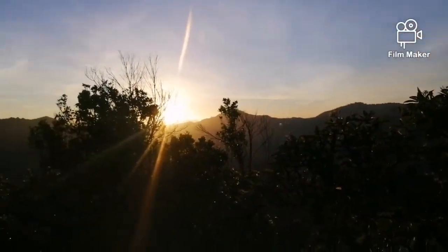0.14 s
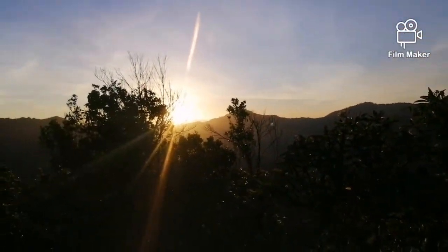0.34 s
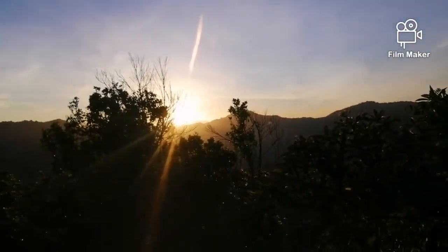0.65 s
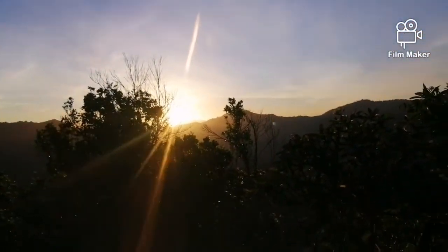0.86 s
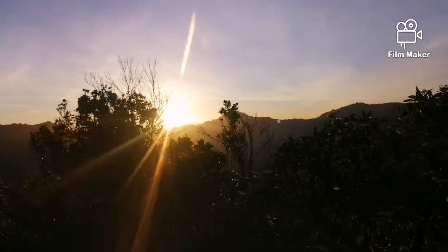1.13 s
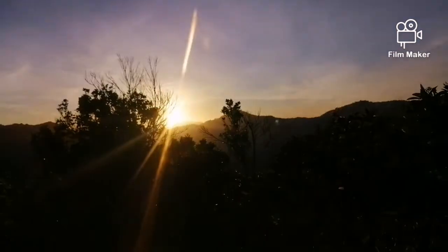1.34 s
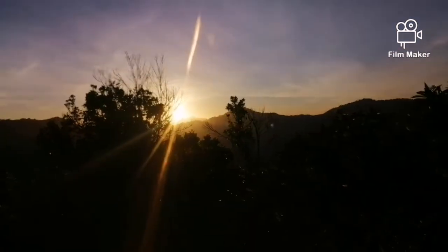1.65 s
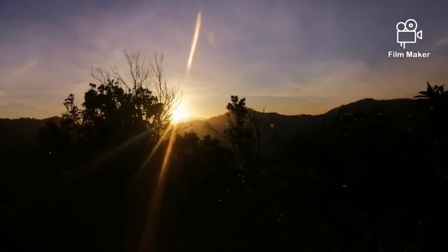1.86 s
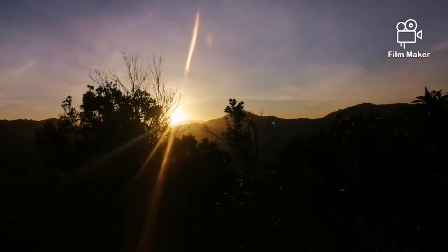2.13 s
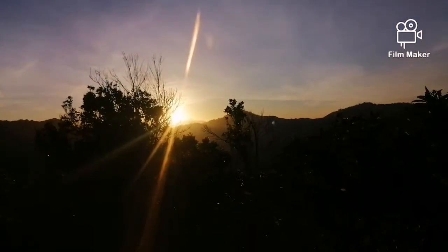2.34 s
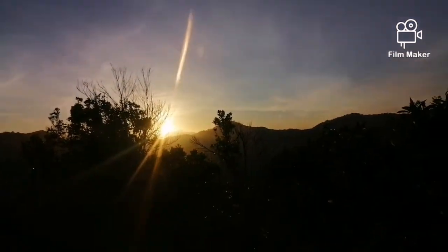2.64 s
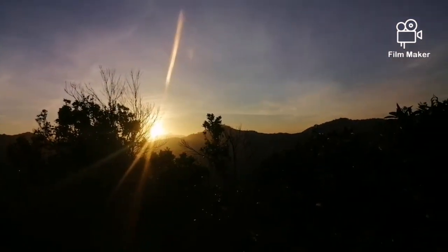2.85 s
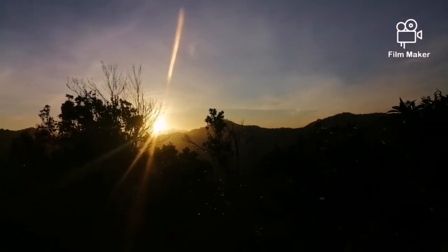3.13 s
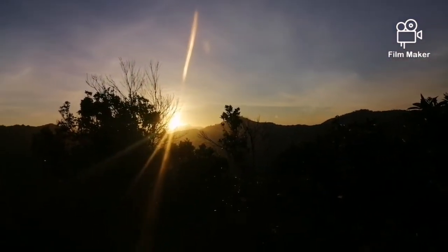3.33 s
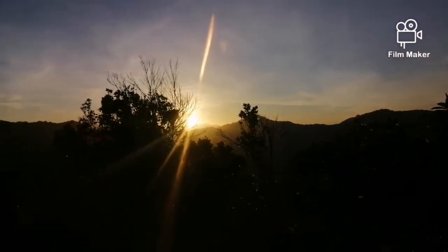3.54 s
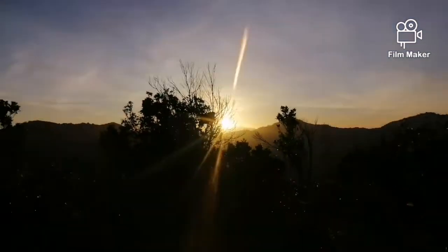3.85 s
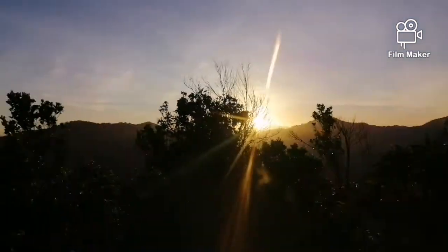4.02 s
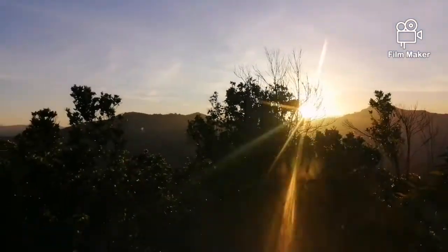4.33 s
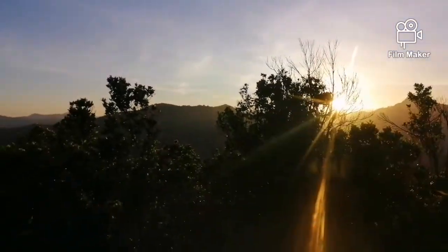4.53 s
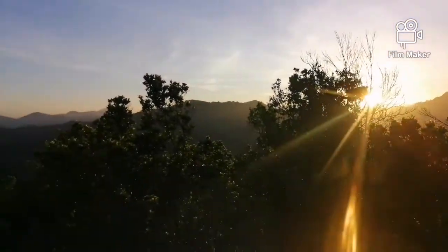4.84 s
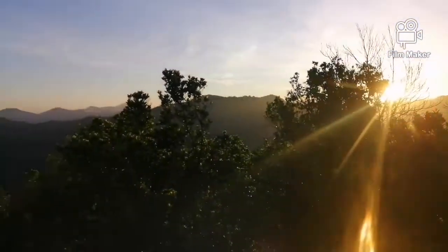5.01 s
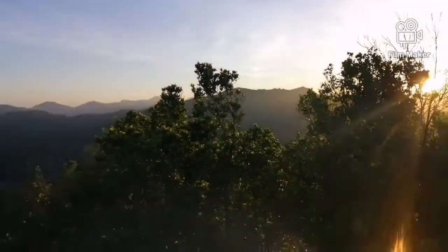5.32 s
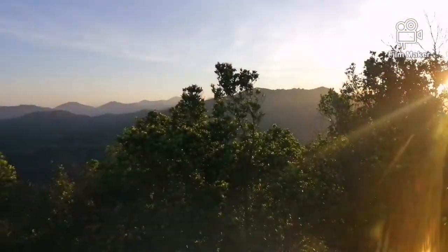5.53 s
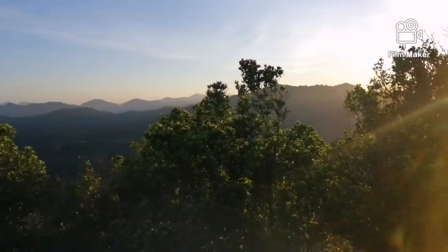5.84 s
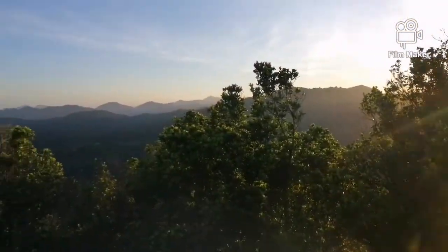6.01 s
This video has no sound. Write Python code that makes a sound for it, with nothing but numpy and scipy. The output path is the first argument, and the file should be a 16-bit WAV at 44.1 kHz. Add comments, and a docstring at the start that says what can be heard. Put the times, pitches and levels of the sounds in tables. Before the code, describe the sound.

Outdoors on a wooded hillside in low sun, one close bird on the right gives short, nasal-edged rising chips, roughly two or three a second. Others of its kind answer softer among the trees, a small warbler twitters, and distant birds whistle. Quiet air and a wavering low hum lie beneath. The hand-held stereo microphone pops early and knocks near the end, as its turn makes the chips more central and duller.

```python
"""A near bird, to the right, repeats a short two-part chip: a nasal lead-in, then a rising two-pulse note.
Its flock answers from deeper in the trees with the same partials, softer and more echoed. A small warbler
twitters and far birds whistle in gliding sines; decaying noise tails make the forest echo of every call.
Under this dawn chorus lie shaped-noise air and a low wavering hum. The hand-held microphone adds pops
(leaking jumps), knocks (decaying noise) and rumble (bass noise)."""
import sys
import numpy as np
from scipy import signal
from scipy.fft import rfft, irfft, next_fast_len
from scipy.io import wavfile
from scipy.ndimage import map_coordinates

SR = 44100
rng = np.random.default_rng(int(sys.argv[2]) if len(sys.argv) > 2 else 0)


def store_wav(level_fs):
    """Save 16-bit WAV to argv[1]."""
    pcm = np.round(np.clip(np.atleast_2d(level_fs), -1, 1) * 32767)
    wavfile.write(sys.argv[1], SR, pcm.T.astype(np.int16))


N = 272097

CHIP_LEAD_S = .02  # room for the lead-in ahead of a chip's main note

# The warbler's kinds of note. Each entry: length in seconds, end pitch over start pitch, pitch roughness
# as a fraction.
WARBLER_NOTES = {"up": (.015, 1.19, .016), "flick": (.012, .8, .022), "down": (.028, .79, .028),
                 "buzz": (.025, .88, .055), "slide": (.035, 1.1, .025), "trill": (.08, .91, .075)}


def amp(db):
    """Decibels to gain."""
    return 10 ** (np.asarray(db) / 20)


def unit(x):
    """Scale to rms 1."""
    return x / np.sqrt(np.mean(x ** 2) + 1e-20)


def along(points, hz):
    """(Hz, value) points read on a log frequency axis."""
    f, v = np.transpose(points)
    return np.interp(np.log(hz + 1), np.log(f + 1), v)


def curve(rows):
    """(seconds, value) rows drawn as a line, one value per sample."""
    return np.interp(np.arange(N) / SR, *np.transpose(rows))


def wobble(rate, size=N):
    """A smooth random curve with rate knots a second."""
    knots = rng.standard_normal(int(size * rate / SR) + 4)
    return map_coordinates(knots, [np.arange(size) * rate / SR])


def filtered(x, response):
    """x with its spectrum multiplied by a response of frequency."""
    m = next_fast_len(x.shape[-1] + SR // 4)
    spectrum = rfft(x, m) * response(np.fft.rfftfreq(m, 1 / SR))
    return irfft(spectrum, m)[..., :x.shape[-1]]


def sides(balance_db):
    """Left and right gains of mean power 1; a positive balance leans left."""
    g = amp(np.array([[.5], [-.5]]) * balance_db)
    return g / np.sqrt(np.mean(g ** 2, axis=0))


def add(out, s, x):
    """Mix x into out from time s in seconds."""
    i = max(round(s * SR), 0)
    out[:, i:i + x.shape[1]] += x[:, :max(N - i, 0)]


def gate(t, start, end, edge):
    """1 from start to end, with soft edges."""
    return (np.tanh((t - start) / edge) - np.tanh((t - end) / edge)) / 2


def echoes(x, leaves_db, forest_db, leaves_t60, balance_db):
    """Near foliage scatters a sound quickly; the trunks behind give a long tail, duller on the left."""
    # The forest's decay. Each row: frequency in Hz, time to fall 60 dB in seconds.
    forest_decay = [(1500, 0.53), (2700, 0.42), (5500, 0.4), (9000, 0.3)]
    hz, t, bins = signal.stft(rng.standard_normal((2, SR * 3 // 4)), SR, nperseg=256)
    decay = amp(-60 * t / along(forest_decay, hz)[:, None])
    far = signal.istft(bins * decay, SR, nperseg=256)[1]
    t = np.arange(far.shape[1]) / SR
    far = far * (1 - np.exp(-t / 0.03))
    near = rng.standard_normal(far.shape) * amp(-60 * t / leaves_t60) * (1 - np.exp(-t / 0.0025))
    tail = (amp(leaves_db) * unit(near) + amp(forest_db) * unit(far)) / np.sqrt(len(t))
    wet = signal.fftconvolve(x[None], tail, axes=1)
    # balance_db is reached at 4 kHz, and grows from nothing in the bass
    return filtered(wet, lambda hz: sides(balance_db * np.minimum(hz / 4000, 1.5)))


def chip(pitch_hz, length, octave_db, lead_db, rise, rough, attack):
    """The five partials of one chip: a low nasal lead-in, then a jump to a rising two-pulse note."""
    t = np.arange(int((length + 2 * CHIP_LEAD_S) * SR)) / SR - CHIP_LEAD_S
    u = np.clip(t / length, 0, 1.3)  # progress through the main note
    bend = rise * (np.sin(1.874 * u) - .65)
    hz = pitch_hz * (1 + bend + rough * wobble(706.4, size=len(t)))
    phase = 2 * np.pi * np.cumsum(hz) / SR

    pinch = .38 + rng.normal(0, 0.053)  # the note nearly stops between its two pulses
    shape_db = -14 * np.exp(-((u - pinch) / .07) ** 2) - 28 * np.maximum(u - .65, 0)
    note = gate(t, 0, length, attack) * amp(shape_db + 1.4 * wobble(234, size=len(t)))
    note *= np.sqrt(2 * length * SR / np.sum(note ** 2))
    # the octave flares as it sweeps through the beak's resonance
    beak = amp(-7.5 + 11.16 * np.exp(-((u - pinch - .16) / .15) ** 2))
    main_gains = [1, amp(octave_db) * beak, amp(-39), amp(-57.5), amp(-49) * beak]

    lead_hz = (2160 + 23000 * np.clip(t, -.02, .004)) * (1 + rng.normal(0, .012))
    lead_phase = 2 * np.pi * np.cumsum(lead_hz) / SR
    lead = amp(lead_db + 4) * gate(t, -0.0087, -0.0007, .0017)
    nasal_gains = [1, amp(-13 + octave_db), amp(-7.5 + 2 * min(octave_db, 2)), amp(-45), 0]

    partials = []
    for k, (main_gain, nasal_gain) in enumerate(zip(main_gains, nasal_gains), 1):
        main_part = main_gain * note * np.sin(k * phase)
        partials.append(main_part + nasal_gain * lead * np.sin(k * lead_phase))
    return np.array(partials)


def placed(partials, balance_db, shadow_db):
    """Overtones are shaded further from the left than the fundamental; the far side hears the call later."""
    pair = partials[0] * sides(balance_db) + partials[1:].sum(0) * sides(balance_db + shadow_db)
    lag = -np.sign(balance_db) * .00027  # seconds the left trails the right
    return filtered(pair, lambda hz: np.exp(np.array([[-1j], [1j]]) * np.pi * hz * lag))


def slur(length, start_hz, end_hz, rough):
    """One gliding note; fast flutter of its pitch turns it from a whistle into a buzz."""
    u = np.linspace(0, 1, int(length * SR))
    hz = (start_hz + (end_hz - start_hz) * u) * (1 + rough * wobble(1300, size=len(u)))
    return 2 * np.sin(np.pi * u) * np.sin(2 * np.pi * np.cumsum(hz) / SR)


def air():
    """Soft wind in the valley: shaped noise, most alike at both microphones in the low bands."""
    # Colour of the air. Each row: frequency in Hz, relative density in dB per Hz.
    colour = [(20, 4.5), (60, 11.5), (150, 7.5), (260, 4.5), (420, 0), (650, 3), (1100, -2), (2000, -2),
              (4500, -7.5), (6500, -9.5), (8200, -18), (9000, -26), (14000, -28)]
    # Stereo lean. Each row: frequency in Hz, left-right balance in dB.
    lean = [(50, -2.5), (700, -1.5), (2000, -5.5), (4000, -8.5), (7000, -12.5), (9500, 1.5)]
    # Stereo width. Each row: frequency in Hz, left-right likeness (correlation).
    likeness = [(50, 0.25), (200, 0.64), (700, 0.33), (2000, 0), (6000, 0.044)]
    # Slow swell of the wind. Each row: time in seconds, level in dB before a 7 dB lift.
    breeze = [(0.0, -72), (0.39, -72), (1.44, -73), (2.89, -72), (3.66, -72), (4.09, -69), (5.53, -73),
              (5.98, -71), (6.17, -72)]

    def mid_side(hz):
        turn = np.arccos(np.clip(along(likeness, hz), -1, 1)) / 2
        return amp(along(colour, hz)) * [np.cos(turn), np.sin(turn)]

    mid, side = filtered(rng.standard_normal((2, N)), mid_side)
    pair = filtered(np.array([mid + side, mid - side]), lambda hz: sides(along(lean, hz)))
    return unit(pair) * amp(curve(breeze) + 7 + 1.1 * wobble(5.6))


def hum():
    """A wavering low sine comes and goes, settling on its pitch each time, with a little rush around it."""
    # Swells. Each row: start in seconds, end in seconds, level in dB before a 2 dB trim, starting pitch in Hz.
    swells = [(1.32, 1.47, -58, 152), (1.72, 2.62, -59.5, 157), (2.81, 3.13, -58.5, 153),
              (3.81, 5.09, -57, 118), (5.26, 5.39, -57.5, 152)]
    settled_hz, settle_s, attack_s, release_s = 153, .08, .05, .06
    rest_db = -75  # level between swells, before the same trim
    t = np.arange(N) / SR
    level, hz = np.full(N, amp(rest_db)), np.full(N, float(settled_hz))
    for start, end, db, start_hz in swells:
        fade_in = (1 + np.tanh((t - start) / attack_s)) / 2
        fade_out = (1 - np.tanh((t - end) / release_s)) / 2
        level += amp(db) * fade_in * fade_out
        hz += (start_hz - settled_hz) * np.exp(-((t - start) / settle_s) ** 2)
    phase = 2 * np.pi * np.cumsum(hz + 1.5 * wobble(16)) / SR
    tone = np.sqrt(2) * np.sin(phase) * amp(0.88 * wobble(18))
    rush_colour = [(60, -18), (120, -5.5), (150, 7), (190, -14), (300, -11), (900, -56)]  # (Hz, dB)
    rush = unit(filtered(rng.standard_normal(N), lambda hz: amp(along(rush_colour, hz))))
    return (tone + amp(-6) * rush) * level * amp(1.1 * wobble(8) - 2) * sides(-6.5)


def microphone():
    """Electrical pops on the left leak away, knocks on the case ring down, and the hand rumbles in the bass."""
    # Colour of the rumble. Each row: frequency in Hz, relative density in dB per Hz.
    rumble_colour = [(15, -15), (45, 8.5), (100, -2.5), (170, -18.5), (500, -53), (2000, -100)]
    # Shifts of the grip. Each row: centre in seconds, half length in seconds, rumble level in dB.
    grip_shifts = [(.08, .16, -58), (5.56, .025, -54.5), (5.845, .04, -44.5), (6.0, .24, -62)]
    # Crackles. Each row: start in seconds, jump in dB before filtering, leak time in seconds, low cut in Hz.
    pops = [(0.1177, -6, 0.004, 2.17), (0.8004, -18.5, 0.0033, 144), (.811, -14.5, 0.0081, 138)]
    # Small knocks. Each row: start in seconds, starting level in dB, time to fall 60 dB in seconds,
    # treble limit in Hz, left-right balance in dB.
    knocks = [(0.181, -49.5, 0.0077, 7000, -17), (3.162, -46, .005, 4000, 9.5),
              (3.165, -56.5, 0.11, 230, 4), (3.947, -62.5, 0.0079, 6130, 5.5),
              (5.7078, -40, 0.019, 1610, 6), (5.709, -33, 0.013, 2810, 9.5),
              (5.718, -45.5, 0.063, 2200, -8)]
    rest_db, tremor_db = -81, 3  # the resting hand is never quite still
    t = np.arange(N) / SR
    rumble = unit(filtered(rng.standard_normal((2, N)), lambda hz: amp(along(rumble_colour, hz))))
    grip = amp(rest_db + tremor_db * wobble(5))
    for s, width, db in grip_shifts:
        grip += amp(db) * np.exp(-((t - s) / width) ** 2)
    out = rumble * grip
    for s, db, leak, cut_hz in pops:
        jump = amp(db) * (t >= s) * np.exp(-abs(t - s) / leak)
        out[0] += filtered(jump, lambda hz: hz ** 8 / (hz ** 8 + cut_hz ** 8) / (1 + (hz / 6500) ** 4))
    t = np.arange(SR // 8) / SR
    for s, db, t60, bright_hz, balance_db in knocks:
        noise = rng.standard_normal((2, len(t)))
        grit = unit(filtered(noise, lambda hz: hz / (hz + 400) / np.hypot(1, (hz / bright_hz) ** 3)))
        add(out, s, amp(db - 60 * t / t60) * grit * sides(balance_db))
    return out


def far_chorus(count=48):
    """Many distant chips and slurs at random pitches, blurred into a wash by echo alone."""
    calls = np.zeros((1, N))
    for k, (when, pitch, size) in enumerate(rng.random((count, 3))):
        s = (k + when) * N / SR / count
        partials = chip(2400 + 380 * pitch, 0.037, octave_db=-4, lead_db=-8.5,
                        rise=0.077, rough=0.02, attack=0.002)
        add(calls, s, amp(-74 + 3.3 * size) * partials.sum(0)[None])
        glide = slur(.05, 1500 + 3400 * pitch, 1150 + 2900 * pitch, rough=.04)
        add(calls, s, amp(-77.5 + 3 * size) * glide[None])
    return echoes(calls[0], leaves_db=-0.5, forest_db=5, leaves_t60=0.09, balance_db=-7.5)[:, :N]


def whistlers():
    """Slow gliding whistles of far birds, the faint ones mostly echo."""
    # Each row: start in seconds, length in seconds, start pitch in Hz, end pitch in Hz,
    # level in dB before distance shifts it from direct sound to echo.
    whistles = [(2.33, .12, 1860, 1810, -70.5), (3.15, .22, 1160, 1320, -73.5),
                (3.223, .078, 2540, 2480, -64.5), (3.29, .06, 2000, 1900, -69),
                (3.971, .056, 2420, 2370, -59), (5.059, .19, 2560, 2596, -62),
                (5.311, .19, 2750, 2344, -58), (5.35, .19, 1370, 1220, -74), (5.521, .069, 3950, 3600, -65),
                (5.867, .08, 3660, 3430, -64.5)]
    clear_db, blur_per_db = -56, .05  # the fainter a whistle, the farther off and the more blurred
    out = np.zeros((2, N))
    for s, length, start_hz, end_hz, db in whistles:
        blur = np.clip(blur_per_db * (clear_db - db), 0, 1)
        note = amp(db) * slur(length, start_hz, end_hz, rough=.004 + 0.031 * blur)
        add(out, s, amp(-7 * blur) * note * sides(-14))
        wet = echoes(note, leaves_db=-10, forest_db=-9, leaves_t60=0.1, balance_db=-6)
        add(out, s, amp(7 * blur) * wet)
    return out


def soft_notes():
    """Quick runs of notes of any kind, scattered over the warbler's range: start, kind, pitch, level."""
    # Runs of softer notes. Each row: start in seconds, end in seconds, level in dB.
    runs = [(2.87, 3.35, -71), (4.2, 4.65, -68.5), (5.92, 6.1, -68)]
    notes_per_s, low_hz, high_hz = 17, 3300, 6400
    kinds = list(WARBLER_NOTES)
    notes = []
    for start, end, db in runs:
        for s in np.arange(start, end, 1 / notes_per_s):
            late, kind, pitch = rng.random(3)
            start_hz = low_hz + (high_hz - low_hz) * pitch
            notes.append((s + late / notes_per_s, kinds[int(kind * len(kinds))], start_hz, db))
    return notes


def warbler():
    """The warbler's twitter of short slurs on the right, ringing in the trees."""
    # Its clearest notes. Each row: start in seconds, kind of note, start pitch in Hz, level in dB.
    clear_notes = [(.003, "trill", 4050, -61), (.047, "up", 5600, -65), (.165, "slide", 3300, -66),
                   (.185, "trill", 7400, -70.5), (.612, "up", 5850, -53.5), (1.56, "down", 2650, -56.5),
                   (2.755, "down", 2200, -64), (2.863, "up", 6000, -67), (2.9, "flick", 7400, -66),
                   (3.09, "slide", 3400, -64.5), (3.128, "down", 2080, -64.5), (3.152, "buzz", 7200, -63.5),
                   (3.212, "up", 6400, -60.5), (3.305, "buzz", 6900, -62.5), (3.368, "down", 1950, -64.5),
                   (3.496, "flick", 8000, -61), (3.597, "slide", 3750, -60), (3.623, "up", 4030, -52),
                   (3.755, "down", 2740, -55), (3.842, "buzz", 7300, -54.5), (3.872, "buzz", 6900, -57.5),
                   (4.083, "buzz", 7200, -60), (4.081, "up", 4300, -57), (4.097, "flick", 4900, -55),
                   (4.213, "up", 6300, -62), (4.475, "down", 2650, -54), (4.787, "down", 2680, -53.5),
                   (5.772, "slide", 3500, -60)]
    out = np.zeros((2, N))
    for s, kind, start_hz, db in clear_notes + soft_notes():
        length, glide, rough = WARBLER_NOTES[kind]
        note = amp(db) * slur(length, start_hz, start_hz * glide, rough)
        add(out, s, note * sides(-20))
        add(out, s, echoes(note, leaves_db=-3, forest_db=-7.5, leaves_t60=0.34, balance_db=-11))
    return out


def flock():
    """The same chip from farther off: distance softens its edge and trades direct sound for echo."""
    # The answers. Each row: start in seconds, perch, centre pitch in Hz, length in seconds,
    # level in dB before distance splits it into direct sound and echo.
    answers = [(0.263, "right", 2655, .057, -52), (0.724, "right", 2710, .031, -41.5),
               (0.932, "deep", 2480, .04, -55), (1.065, "right", 2733, .038, -44.5),
               (1.546, "deep", 2550, .046, -55), (1.934, "deep", 2530, .03, -51),
               (2.927, "right", 2765, .039, -47.5), (3.497, "left", 2700, .032, -45),
               (3.845, "left", 2760, .031, -43.5), (4.461, "ahead", 2620, .022, -40),
               (5.184, "ahead", 2712, .049, -43), (5.578, "ahead", 2648, .02, -41),
               (5.69, "ahead", 2612, .022, -43), (6.076, "left", 2800, .027, -41)]
    # The birds by perch. Each entry: octave over fundamental in dB before the beak,
    # left-right balance in dB, distance from 0 to 1.
    perches = {"right": (0, -20, .58), "deep": (-10, -12, .65), "left": (2.5, 17, .55),
               "ahead": (-3, 1, .08)}
    out = np.zeros((2, N))
    for s, perch, pitch_hz, length, db in answers:
        octave_db, balance_db, distance = perches[perch]
        partials = amp(db) * chip(pitch_hz, length, octave_db, lead_db=-15.5, rise=0.0454,
                                  rough=0.018, attack=0.00076 + 0.0089 * distance)
        start = s - CHIP_LEAD_S
        add(out, start, amp(1.5 - 5.7 * distance) * placed(partials, balance_db, shadow_db=-5))
        add(out, start, echoes(partials.sum(0), leaves_db=-3.5 + 6.6 * distance, forest_db=-3,
                               leaves_t60=0.15, balance_db=-7))
    return out


def near_bird():
    """Clear chips from the nearest tree, duller and more central as the microphone swings away."""
    # Each row: start of the main note in seconds, centre pitch in Hz, length in seconds,
    # level in dB before a 2.8 dB trim.
    chips = [(0.066, 2720, .022, -41), (0.63, 2710, .018, -39.6), (0.998, 2715, .026, -32.5),
             (1.417, 2730, .028, -35), (1.767, 2750, .027, -34.5), (2.173, 2755, .026, -34.5),
             (2.555, 2725, .026, -34), (2.975, 2725, .022, -34.5), (3.366, 2745, .022, -35),
             (3.683, 2750, .023, -31.5), (4.035, 2735, .018, -32), (4.403, 2755, .0275, -32.5),
             (4.727, 2780, .032, -32.5), (5.149, 2755, .036, -35), (5.493, 2740, .038, -35.5),
             (5.832, 2800, .025, -32), (6.152, 2820, .028, -32)]
    turn_s = (3.9, 4.5)  # the swing starts and ends
    # before and after the swing: octave over fundamental at full voice in dB, left-right balance in dB,
    # lead-in in dB, attack in seconds, pitch roughness, foliage echo in dB, echo balance in dB
    facing = (2.6, -27, -10, .0007, .011, -2, -13.5)
    turned = (-4.3, -9, -14.5, .002, .017, -1, -9)
    full_voice_db, dulling = -37.5, 2.2  # below full voice the octave loses this many dB per dB
    mean_rise, rise_scatter, lead_scatter_db = .075, .013, 1.2  # no two chips bend or start quite alike
    out = np.zeros((2, N))
    for s, pitch_hz, length, db in chips:
        settings = [np.interp(s, turn_s, pair) for pair in zip(facing, turned)]
        octave_db, balance_db, lead_db, attack, rough, leaves_db, echo_balance_db = settings
        octave_db += dulling * min(db - full_voice_db, 0)
        lead_db += rng.normal(0, lead_scatter_db)
        rise = mean_rise + rng.normal(0, rise_scatter)
        partials = amp(db - 2.8) * chip(pitch_hz, length, octave_db, lead_db, rise, rough, attack)
        start = s - CHIP_LEAD_S
        add(out, start, placed(partials, balance_db, shadow_db=-5.5))
        add(out, start, echoes(partials.sum(0), leaves_db=leaves_db, forest_db=-10.5,
                               leaves_t60=0.15, balance_db=echo_balance_db))
    return out


def scene():
    """All the birds over the quiet hillside, with the microphone's own noises."""
    background = air() + hum() + microphone()
    distant_birds = far_chorus() + whistlers()
    return background + distant_birds + warbler() + flock() + near_bird()


def record(dry):
    """A sharp band limit removes the extreme treble; the sound starts and stops softly."""
    top_hz = 15100
    edges = gate(np.arange(N) / SR, .002, N / SR - .002, .0007)
    return filtered(dry * edges, lambda hz: hz < top_hz)


dry = scene()
out = record(dry)
store_wav(out)
```